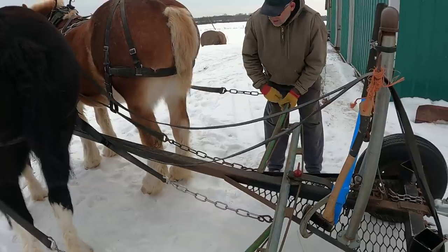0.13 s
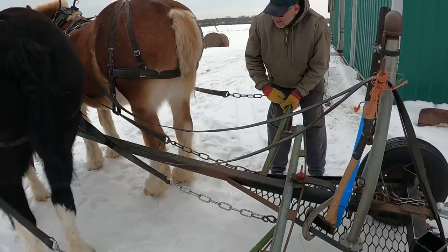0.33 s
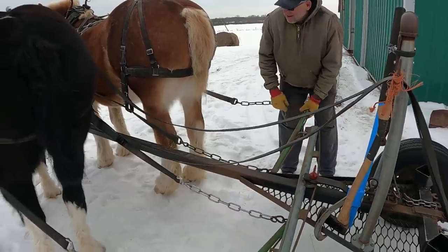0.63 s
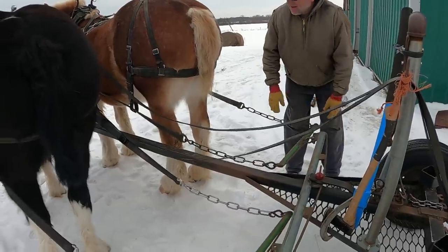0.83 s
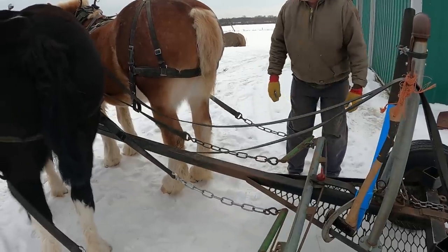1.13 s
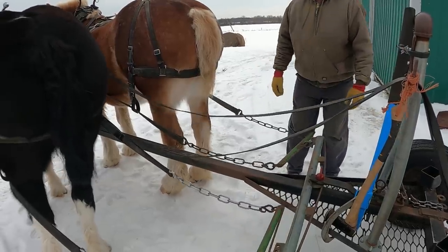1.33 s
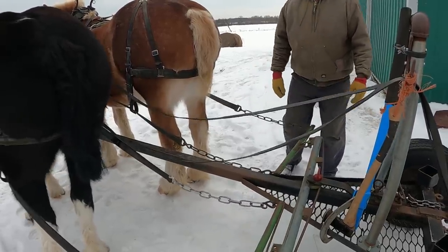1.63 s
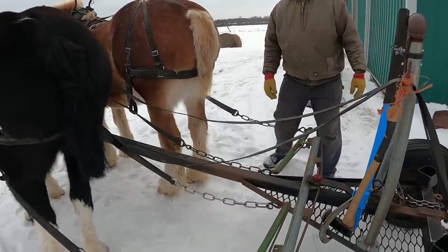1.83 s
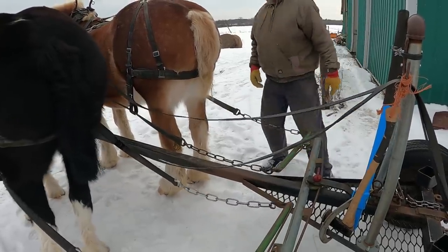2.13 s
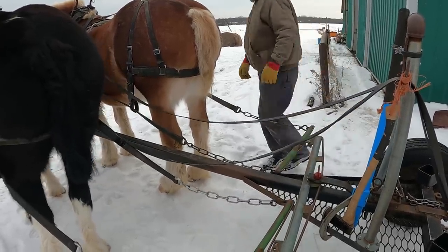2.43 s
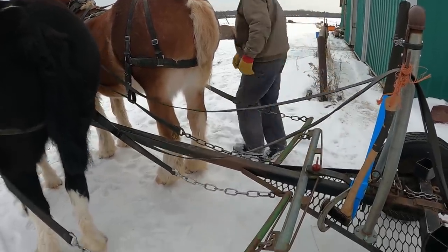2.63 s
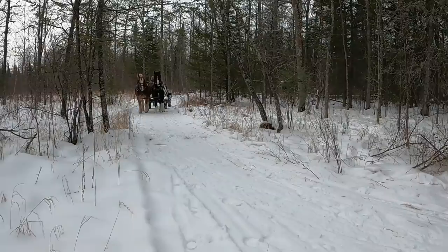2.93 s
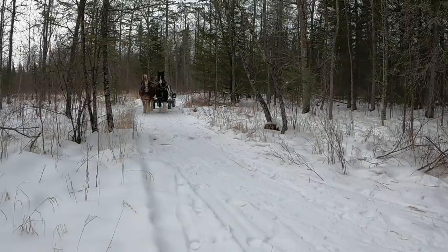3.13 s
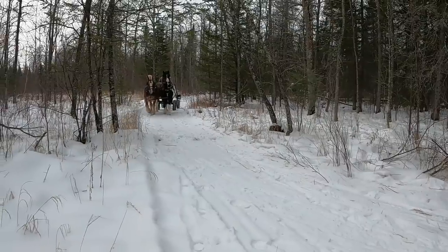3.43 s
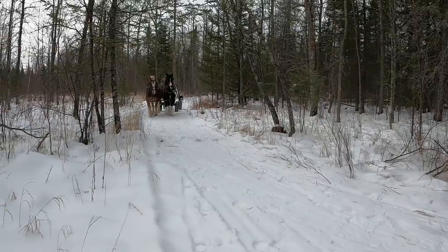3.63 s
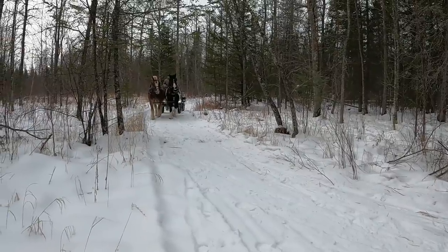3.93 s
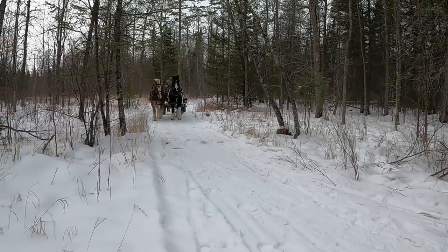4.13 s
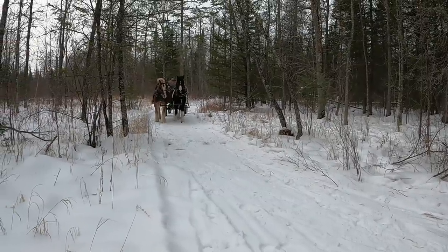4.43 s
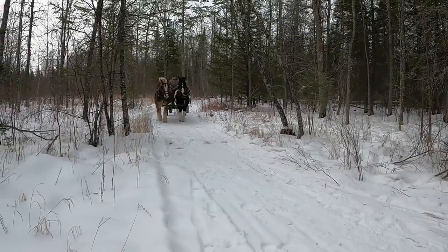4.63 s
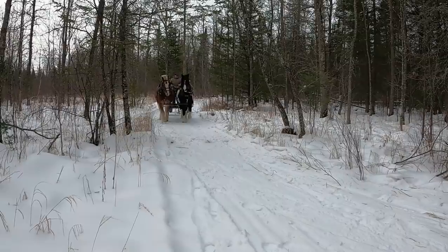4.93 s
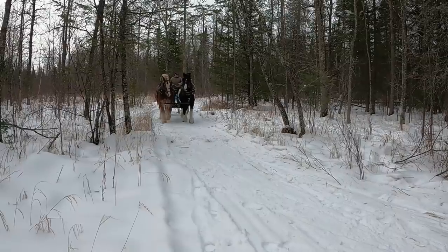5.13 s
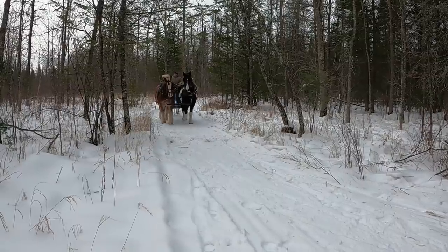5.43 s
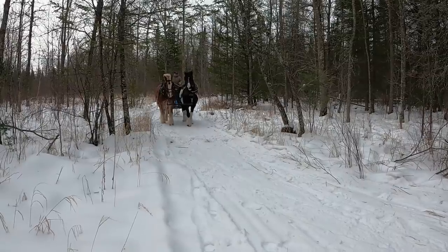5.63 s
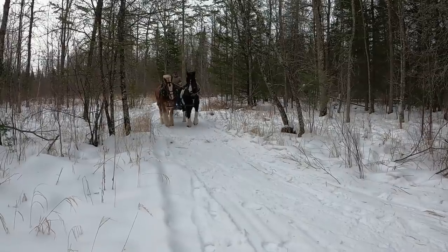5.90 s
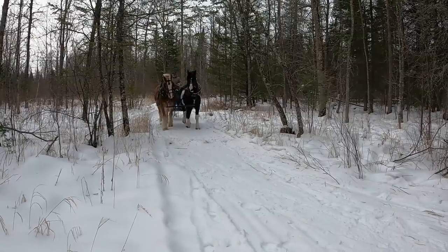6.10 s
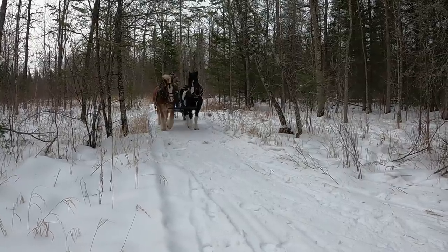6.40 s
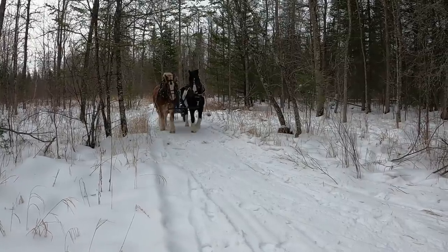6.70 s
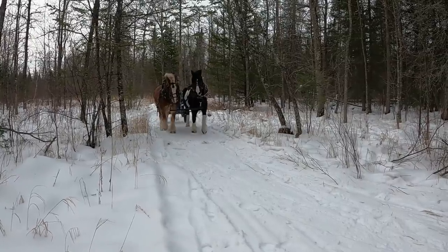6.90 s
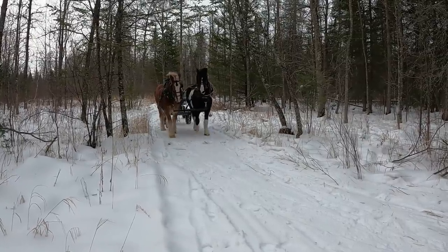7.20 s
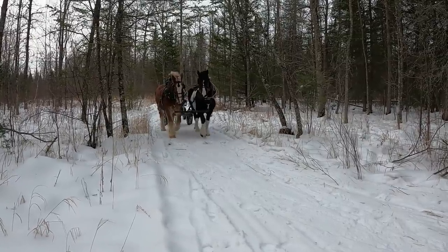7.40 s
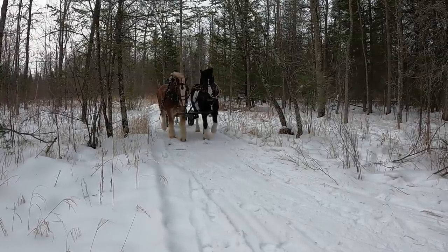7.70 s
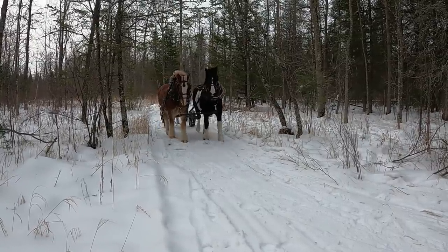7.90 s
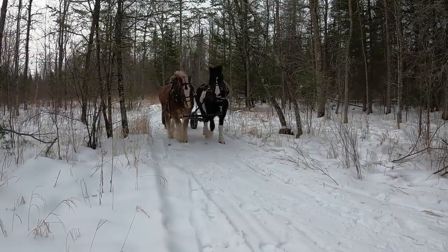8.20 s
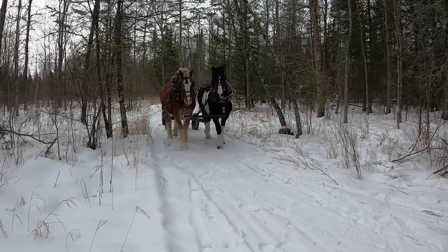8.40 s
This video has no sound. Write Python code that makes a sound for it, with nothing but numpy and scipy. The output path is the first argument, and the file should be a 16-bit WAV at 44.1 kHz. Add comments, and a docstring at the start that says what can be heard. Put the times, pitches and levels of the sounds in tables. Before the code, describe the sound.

For the first three seconds, a close mono snowy yard: chains clank against a steel cart frame, ringing briefly, faintly at first, strongest from 0.55 to 1.1 and 1.6 to 1.9 seconds, with a faint hook ring at 0.15 and 0.4. Wind rumbles on the microphone, with sputtering gusts near 0.4 to 0.5, 0.9 and 1.35. Feet shuffle in snow, with dull thumps at 1.6, 2.0, 2.3 and 2.7. At 3.0 it cuts to a quieter, wide stereo forest trail. Two horses approach, hooves falling out of step about six times a second, tyres hissing and crackling on snow above a low cart rumble. Small clinks grow; bright harness rings stand out at 5.0 to 5.5, a sharp rattle at 6.4, more jingles around 7.4. Heavy hoof thuds and crunches increase from 5.9 to the end at 8.5, with dull reflections from the trunks.

```python
"""A snowy yard, then a forest trail: two draft horses and a steel cart, in two scenes.
Yard, close and mono: trace chains excite the ringing modes of the cart's frame, a hook rings,
feet shuffle and thump as filtered noise and pulses, and wind rumbles on the microphone in octave bands.
Trail, wide stereo, the team nearing: hooves thud and crunch, rings and links sound as decaying sines,
fittings clatter in bursts of clicks, tyres hiss and the trunks return a dull tail."""
import sys
import numpy as np
from scipy import signal
from scipy.fft import rfft, irfft
from scipy.io import wavfile
from scipy.ndimage import uniform_filter1d

SR = 44100
rng = np.random.default_rng(int(sys.argv[2]) if len(sys.argv) > 2 else 0)


def generate_wav(sig):
    """Save sig (samples, or channels by samples) to the path in sys.argv[1] as 16-bit PCM at SR."""
    pcm = np.round(np.clip(np.atleast_2d(sig).T, -1, 1) * 32767).astype(np.int16)
    wavfile.write(sys.argv[1], SR, pcm)


N = 377055
T = np.arange(N) / SR
AGE = T[:SR // 2]   # time since a blow, s


def from_db(db):
    """Decibels to gain."""
    return 10 ** (np.asarray(db) / 20)


def rms_one(x):
    """Scale to unit power."""
    return x / np.sqrt(np.mean(x ** 2) + 1e-20)


def peak_one(x, size=200):
    """Scale so that the loudest few milliseconds have unit power."""
    return x / np.sqrt(uniform_filter1d(x ** 2, size).max() + 1e-20)


def in_time(rows):
    """Draw the level of a (time, level) table over the whole scene."""
    s, db = np.transpose(rows)
    return np.interp(T, s, db)


def at_hz(points, hz):
    """Read a spectrum on a log-frequency axis."""
    f, value = np.transpose(points)
    return np.interp(np.log(hz), np.log(f), value)


def cut(x, hz, kind, order=2):
    """Butterworth filter."""
    return signal.sosfilt(signal.butter(order, hz, kind, fs=SR, output="sos"), x)


def drift(rate):
    """Smooth chance of unit power, with a new random target at the given rate per second."""
    knots = rng.standard_normal(2000)
    return rms_one(np.interp(T * rate, np.arange(len(knots)), knots))


def add(track, s, sound):
    """Mix a sound in at a time."""
    i = max(round(s * SR), 0)
    track[i:i + len(sound)] += sound[:max(N - i, 0)]


def ringing(modes, t60):
    """One decaying sine per mode."""
    hz, db = np.transpose(modes)[:, :, None]
    return from_db(db - 60 * AGE / t60) * np.sin(2 * np.pi * hz * AGE)


def contacts(per_s, spread_db):
    """Random small touches of uneven size, unit power."""
    touched = rng.random(len(AGE)) < per_s / SR
    sizes = from_db(spread_db * rng.standard_normal(len(AGE)))
    return rms_one(touched * rng.choice([-1, 1], len(AGE)) * sizes)


def with_treble(x, treble_db, split_hz=5000):
    """Set the balance of treble to body; a harder contact puts more energy in the treble."""
    body = rms_one(cut(x, split_hz, "low", order=4))
    treble = rms_one(cut(x, split_hz, "high", order=4))
    return peak_one(body + from_db(treble_db) * treble)


def tap(modes, t60, hardness_db, spread_db=3, damped_db=-18, flutter_db=3):
    """A small steel piece flutters as it swings; falling back on its strap checks some modes more."""
    hz = np.transpose(modes)[0]
    tilt_db = hardness_db * np.log2(hz / hz[0])
    strengths = from_db(spread_db * rng.standard_normal(len(hz)) + tilt_db)
    touched = np.clip((AGE - rng.uniform(.03, .08)) / .015, 0, 1)   # strap contact, 0 to 1
    damping = damped_db * np.outer(rng.random(len(hz)), touched)
    flutter = flutter_db * np.cos(2 * np.pi * np.outer(rng.uniform(12, 55, len(hz)), AGE))
    tone = strengths @ (ringing(modes, t60) * from_db(damping + flutter))
    return peak_one(tone) * np.minimum(AGE / .002, 1)


# stereo width of the noises: f/Hz, level/dB (side re mid)
TRAIL_WIDTH = [(60, -66), (240, -13), (950, -9.5), (3770, -2.5), (15000, -7)]


def banded_noise(spectrum, patchy_db):
    """Half-octave bands of stereo noise, each flickering on its own, to unit power."""
    out, edges = 0, 20 * 2 ** (np.arange(21) / 2)
    white = rng.standard_normal((2, 2, N))
    for k, (low, high) in enumerate(zip(edges, edges[1:])):
        hz = np.sqrt(low * high)
        if high > spectrum[0][0] and low < spectrum[-1][0]:
            mid, side = cut(white[k % 2], [low, high], "band")
            gain = from_db(at_hz(spectrum, hz) + patchy_db * drift(60))
            out = out + gain * (mid + from_db(at_hz(TRAIL_WIDTH, hz)) * side * [[1], [-1]])
    return rms_one(out)


# chains striking the cart frame, and at 2.321 s a boot knocking on it: t/s, level/dB (peak), hardness of the
# contact [dB per octave]
CHAIN_BLOWS = [(0.035, -36, -7), (0.141, -35.5, 2.5), (0.194, -38, -2), (0.416, -34.5, -0.5),
               (0.56, -25.5, 0), (0.651, -38.5, 1), (0.705, -23, 3), (0.75, -28, -5), (1.06, -23, -6.5),
               (1.596, -23.5, -5), (1.634, -22, -2.5), (1.807, -27, -2), (1.862, -28.5, -1.5),
               (1.9, -30, -4.5), (1.94, -38, -3), (2.031, -41, -7), (2.321, -49, -6), (2.496, -44.5, -5.5)]
# main modes of the cart frame: f/Hz, level/dB
FRAME_MODES = [(269, -8), (435, -9), (528, -5), (619, -7), (835, -5), (1315, 1), (1540, 2), (1631, 2),
               (1803, -1), (1938, -1), (2384, 2), (3203, -4), (3384, -6), (4197, -8)]
# contour of its many weaker modes: f/Hz, level/dB
FRAME_WEAK_MODES = [(300, -13.5), (1100, -2), (1900, 7), (3400, 4.5), (6700, -5), (15000, -30.5)]


def clanks(frame_t60=0.21, weak_db=-6, weak_t60=0.135, links_db=-22, tumble_s=0.025, onset_s=.005,
           uneven_db=4, tilt_hz=1200, count=420):
    """A chain strikes the frame with a slightly soft onset, then its links tumble;
    the main modes ring longer than most of the weaker high ones."""
    hz = np.linspace(18, 122, count) ** 2 * rng.uniform(.98, 1.02, count)
    weak = np.column_stack([hz, at_hz(FRAME_WEAK_MODES, hz) + weak_db])
    uneven = from_db(uneven_db * hz / hz.max() * rng.standard_normal(count))
    t60 = weak_t60 * uneven * (hz / 2000) ** -.4   # high modes tend to die sooner
    frame = np.vstack([ringing(FRAME_MODES, frame_t60), ringing(weak, t60[:, None])])
    all_hz = np.append(np.transpose(FRAME_MODES)[0], hz)
    octaves = np.maximum(np.log2(all_hz / tilt_hz), 0)   # hardness tilts the modes above tilt_hz
    out = np.zeros(N)
    for s, db, hardness_db in CHAIN_BLOWS:
        force = from_db(links_db) * contacts(450, 6) * np.exp(-AGE / tumble_s)
        force[0] += 1   # the first blow
        chance_db = 3 * rng.standard_normal(len(frame))
        strengths = rng.choice([-1, 1], len(frame)) * from_db(hardness_db * octaves + chance_db)
        ring = signal.fftconvolve(force, strengths @ frame)[:len(AGE)]
        onset = np.minimum(AGE / onset_s, 1) ** 2
        add(out, s - onset_s / 2, from_db(db) * peak_one(ring * onset))
    return out


# blows on a chain hook: t/s, level/dB (peak), hardness [dB per octave]
HOOK_BLOWS = [(0.141, -35, -1), (0.418, -37, -5)]
# modes of the hook: f/Hz, level/dB
HOOK_MODES = [(1453, -12), (2455, -9), (3047, -8), (3908, -14), (4592, -10), (5320, 0), (5771, -11),
              (8576, -5), (9636, -10), (11360, -20), (12630, -26)]
HOOK_T60 = .28   # s


def hook():
    """The hook at the end of a trace chain rings on after the blow."""
    out = np.zeros(N)
    for s, db, hardness_db in HOOK_BLOWS:
        add(out, s, from_db(db) * tap(HOOK_MODES, HOOK_T60, hardness_db))
    return out


# the team draws near: t/s, level/dB (reference for tyres, steps and chains)
TEAM_NEARNESS = [(3.06, -58.5), (3.6, -56.5), (4.7, -55), (5.3, -53), (6.2, -53), (7.4, -49.5), (8.55, -50)]


def nearness_db(s):
    """How loud the team is at a given time."""
    return np.interp(s, *np.transpose(TEAM_NEARNESS))


# first footfall of each horse, same pace but out of step: t/s
FIRST_FOOTFALLS = [3.142, 3.262]
STEP_S, STEP_JITTER_S, STEP_SPREAD_DB = .324, .008, 2


def footfalls():
    """Both horses' even walk with a little chance: rows of (t/s, level/dB)."""
    s = np.concatenate([np.arange(first, T[-1] - .05, STEP_S) for first in FIRST_FOOTFALLS])
    late, strong = rng.standard_normal((len(s), 2)).T
    return np.column_stack([s + STEP_JITTER_S * late, nearness_db(s) + STEP_SPREAD_DB * strong])


# hooves that come down heavily: t/s, level/dB (thud peak), crunch level/dB (re thud)
HEAVY_HOOVES = [(5.937, -39.5, -8), (6.393, -36, -9), (6.826, -38.5, -6.5), (7.006, -40.5, -4.5),
                (7.437, -33.5, -4), (7.746, -34.5, -33), (7.797, -37, -16), (8.001, -32, -4.5),
                (8.136, -40.5, -5), (8.172, -43.5, 3.5), (8.304, -35, -26), (8.334, -34, -5.5)]


def hooves(steps, thud_s=0.011, crunch_s=0.0084, knock_db=24, crunch_hz=(350, 1500),
           light_db=7, light_crunch_db=-7):
    """A hoof knocks through the crust, thuds into the ground and crushes the snow under it."""
    heavy_s = np.transpose(HEAVY_HOOVES)[0]
    # a light step gives way to a heavy one at nearly the same time
    light = [(s, db + light_db, light_crunch_db) for s, db in steps
             if np.abs(heavy_s - s).min() > STEP_S / 10]
    out = np.zeros(N)
    for s, db, crunch_db in list(HEAVY_HOOVES) + light:
        thud = cut(rng.standard_normal(len(AGE)) * np.exp(-AGE / thud_s), [65, 225], "band")
        crush = contacts(1200, 6) * np.exp(-AGE / crunch_s)
        crush[0] += from_db(knock_db)
        crunch = from_db(crunch_db) * peak_one(cut(crush, crunch_hz, "band"))
        add(out, s, from_db(db) * (peak_one(thud) + crunch))
    return out


# taps on a harness ring: t/s, level/dB (peak), hardness [dB per octave]
RING_TAPS = [(3.663, -48.5, 5), (3.930, -45, 5), (4.026, -50, 4), (5.008, -38, 2), (5.091, -41, 1),
             (5.160, -38.5, 5), (5.375, -35.5, 1), (5.525, -28.5, 9.5), (7.187, -42, 1), (7.366, -41, -3),
             (7.429, -35.5, -0.5), (7.99, -43, 10)]
# modes of the ring: f/Hz, level/dB
RING_MODES = [(2686, -15), (3165, -9), (3752, -10), (4673, -11), (5667, -7), (6108, -4), (6395, 0),
              (8430, -15), (10628, -17), (13370, -31), (14070, -35)]
RING_T60, SWING_S, SWING_LOSS_DB = .28, .067, 18.5


def harness_rings():
    """A steel ring is struck, swings back and taps again, more softly."""
    out = np.zeros(N)
    for s, db, hardness_db in RING_TAPS:
        add(out, s, from_db(db) * tap(RING_MODES, RING_T60, hardness_db))
        add(out, s + SWING_S, from_db(db - SWING_LOSS_DB) * tap(RING_MODES, RING_T60, hardness_db))
    return out


# clinks of links of different sizes: t/s, level/dB (peak), pitch f/Hz
LINK_CLINKS = [(3.335, -54, 7666), (4.005, -50, 4581), (4.277, -51, 6056), (5.06, -48, 5669),
               (5.32, -52, 8750), (6.285, -40, 6108), (6.462, -37, 5669), (6.627, -47, 5669),
               (7.131, -41, 6108), (7.675, -50, 6108), (8.318, -49, 4662), (8.318, -54, 8683)]
# modes of the neighbouring links that ring along: f/Hz, level/dB
LINK_MODES = [(4603, -8), (5669, -4), (6108, -9), (8600, -15), (12100, -30)]
LINK_T60 = .21   # s
SOFT_CLINK_T60, SOFT_CLINK_HZ = .08, (5600, 8800)   # taut links: s, range of pitch


def chain_links(steps, per_step=2):
    """Chain links clink with their neighbours; taut ones chink softly and briefly in every step."""
    out = np.zeros(N)
    for s, db, hz in LINK_CLINKS:
        add(out, s, from_db(db) * tap([(hz, 0)] + LINK_MODES, LINK_T60, 0))
    for s, db in np.repeat(steps, per_step, axis=0):
        hz = rng.uniform(*SOFT_CLINK_HZ)
        chink = tap([(hz, 0)] + LINK_MODES, SOFT_CLINK_T60, 0)
        add(out, s + STEP_S * rng.random(), from_db(db) * chink)
    return out


# dry ticks: t/s, level/dB (peak)
DRY_TICKS = [(5.679, -44.5)]


def ticks(decay_s=0.0051, band_hz=(4000, 13000)):
    """A dry tick: a very short burst of bright noise."""
    out = np.zeros(N)
    for s, db in DRY_TICKS:
        burst = rng.standard_normal(len(AGE)) * np.exp(-AGE / decay_s)
        add(out, s, from_db(db) * peak_one(cut(burst, band_hz, "band")))
    return out


# the cart clatters over bumps: t/s, level/dB (peak), decay [s]
CART_BUMPS = [(3.318, -47, 0.014), (3.57, -39.5, 0.011), (4.389, -45, 0.019), (4.965, -41, 0.025),
              (6.403, -31.5, 0.023), (6.424, -28, 0.011), (6.662, -41, 0.021), (7.335, -42.5, 0.043),
              (7.475, -33, 0.0065), (8.016, -48, 0.0065), (8.373, -37, 0.017)]


def clatter(steps, rise_s=0.008, treble_db=-9, shake_db=1, shake_s=0.003,
            body_hz=(1100, 3200), edge_hz=(400, 9500)):
    """Chains and loose fittings shake in dense damped clicks: on bumps, and faintly at every step."""
    shakes = [(s, db + shake_db, shake_s) for s, db in steps]
    out = np.zeros(N)
    for s, db, decay_s in list(CART_BUMPS) + shakes:
        force = contacts(4000, 0.99) * (1 - np.exp(-AGE / rise_s)) * np.exp(-AGE / decay_s)
        sound = cut(cut(force, body_hz, "band", order=1), edge_hz, "band", order=3)
        add(out, s, from_db(db) * with_treble(sound, treble_db))
    return out


# colour of the cart's rumble: f/Hz, level/dB
CART_RUMBLE = [(25, -31), (60, -25), (110, 0), (175, 6), (300, -12), (600, -9), (1200, -47)]


def rumble(mean_db=-51, follows=0.2):
    """The rolling cart rumbles low; its level takes a share of the swing in nearness."""
    near_db = nearness_db(T)
    level_db = mean_db + follows * (near_db - near_db.mean())
    return from_db(level_db) * banded_noise(CART_RUMBLE, patchy_db=4.0)


# colour of the tyre hiss: f/Hz, level/dB
TYRE_HISS = [(300, -12.5), (1300, 14), (2500, 2.5), (6100, 1), (8600, -10), (12200, -14), (16000, -36)]


def tyres(hiss_db=-2.0, grain_db=-7):
    """Snow hisses and crackles under the tyres: flickering noise and random grains of uneven size."""
    hiss = banded_noise(TYRE_HISS, patchy_db=1) * from_db(1.4 * drift(18))
    falls = rng.random(N) < 500 * from_db(5 * drift(10)) / SR   # near 500 grains a second, in flurries
    grains = falls * from_db(4.5 * np.minimum(rng.exponential(1, N), 3))
    crackle = rms_one(cut(cut(grains, [900, 5000], "band", order=1), 8400, "low"))
    return from_db(nearness_db(T)) * (from_db(hiss_db) * hiss + from_db(grain_db) * crackle)


# feet coming down in the yard: t/s, level/dB (peak)
YARD_THUMPS = [(1.597, -20), (1.977, -22), (2.325, -33), (2.667, -29)]


def thumps(band_hz=(45, 170)):
    """A foot comes down on packed snow with one dull push."""
    out = np.zeros(N)
    push = peak_one(cut(1.0 * (AGE == 0), band_hz, "band"))
    for s, db in YARD_THUMPS:
        add(out, s, from_db(db) * push)
    return out


# boots and hooves shuffling in the yard: t/s, level/dB
YARD_SHUFFLE = [(0.03, -49), (0.15, -56.5), (2.2, -55), (2.35, -50.5), (2.47, -59), (2.68, -71.5),
                (2.8, -57.5), (2.97, -50.5)]
# colour of the shuffle: f/Hz, level/dB
SNOW_SHUFFLE = [(300, 15), (2500, 2.5), (8000, -9.5), (14000, -50)]


def shuffle():
    """Boots and hooves shuffle in the snow: patchy noise, folded to mono."""
    noise = banded_noise(SNOW_SHUFFLE, patchy_db=6.0).mean(axis=0)
    return from_db(in_time(YARD_SHUFFLE) + 0.52 * drift(83)) * noise


# wind rumbling on the microphone in the yard: t/s, level/dB
WIND_RUMBLE = [(0.0, -35), (0.17, -45), (0.4, -15), (0.68, -34), (0.79, -24), (0.97, -19.5), (1.21, -42),
               (1.37, -23.5), (1.56, -29.5), (1.84, -31), (1.88, -36), (2.1, -22), (2.23, -37), (2.36, -34),
               (2.45, -47), (2.69, -26.5), (2.75, -33.5), (2.87, -37.5), (2.97, -41.5)]
# gusts breaking into small eddies: t/s, level/dB (eddies), half length [s]
WIND_GUSTS = [(0.369, -39, 0.0033), (0.404, -23, 0.0031), (0.489, -22, 0.01), (0.51, -23, 0.01),
              (0.888, -25.5, 0.005), (0.915, -21.5, 0.0015), (0.91, -40, 0.033), (1.353, -33.5, 0.02),
              (2.04, -46, 0.06), (2.695, -50, 0.027)]


def wind(calm_fall_db=8, full_gust_db=-20, eddy_share=0.55, calm_eddy_db=-24, spit_db=2):
    """Big eddies rumble; in gusts small ones spit on top, reaching higher the harder it blows."""
    big = from_db(in_time(WIND_RUMBLE))
    gusts = sum(from_db(db) ** 2 * np.exp(-((T - s) / length) ** 2) for s, db, length in WIND_GUSTS)
    small = np.sqrt((big * from_db(calm_eddy_db)) ** 2 + gusts)
    # loss from one octave to the next
    fall_db = np.clip(full_gust_db - 20 * np.log10(small), 0, calm_fall_db)
    out = big * rms_one(cut(cut(rng.standard_normal(N), [20, 95], "band"), 145, "low"))
    # from 105 Hz up, one level an octave; the finest eddies spit the most
    levels = [big ** (1 - eddy_share) * small ** eddy_share,
              small,
              small * from_db(-fall_db),
              small * from_db(-8.0 - 2.6 * fall_db)]
    spit = spit_db * drift(140)
    for octave, level in enumerate(levels):
        band = cut(rng.standard_normal(N), np.array([105, 215]) * 2 ** octave, "band", order=3)
        even = band / np.sqrt(uniform_filter1d(band ** 2, size=600))
        out += level * even * rms_one(from_db(octave * spit))
    return out


# light air on the trail: t/s, level/dB
TRAIL_BREEZE = [(3.06, -53.5), (4.3, -55.5), (4.65, -43), (5.2, -57.5), (7.3, -61), (7.75, -48.5),
                (8.55, -60)]


def breeze(side_db=-17):
    """Light air brushes each channel a little differently, as low noise."""
    mid, side = rms_one(cut(rng.standard_normal((2, N)), [20, 85], "band"))
    return from_db(in_time(TRAIL_BREEZE)) * (mid + from_db(side_db) * side * [[1], [-1]])


def yard_air(level_db=-65, top_hz=2360):
    """A quiet, dull hush lies under everything in the yard."""
    return from_db(level_db) * rms_one(cut(rng.standard_normal(N), [200, top_hz], "band"))


def forest(x, t60=0.37, echo_db=-11):
    """Trunks scatter a dull tail, different on each side."""
    noise = cut(rng.standard_normal((2, len(AGE))), [400, 3000], "band", order=1)
    mid, side = noise * from_db(-60 * AGE / t60) * (AGE > .015)
    tails = mid + 0.34 * side * [[1], [-1]]
    echo = signal.fftconvolve(x[None], tails / np.linalg.norm(mid), axes=1)[:, :N]
    return x + from_db(echo_db) * echo


def late_on_the_left(x, lag_samples=0.46):
    """Delay the left channel by a fraction of a sample, as a phase slope."""
    delay = np.exp(-1j * np.pi * lag_samples * np.arange(N + 1) / N)
    return np.stack([irfft(rfft(x[0], 2 * N) * delay)[:N], x[1]])


def scene(yard_ends_s=3.012, trail_begins_s=3.04):
    """The yard, alike in both ears, fades out quickly and the wider trail takes over."""
    yard = clanks() + hook() + thumps() + shuffle() + wind() + yard_air()
    steps = footfalls()
    team = hooves(steps) + harness_rings() + chain_links(steps) + ticks() + clatter(steps)
    trail = late_on_the_left(forest(team)) + rumble() + tyres() + breeze()
    fade_out = np.clip((yard_ends_s - T) / .02, 0, 1)
    fade_in = np.clip((T - yard_ends_s) / (trail_begins_s - yard_ends_s), 0, 1) ** 2
    return yard * fade_out + trail * fade_in


def record(dry, added_treble_db=-5, treble_hz=12000, cutoff_hz=14400):
    """The right channel gets a little more treble; a steep low-pass cuts the top of both."""
    right = dry[1] + from_db(added_treble_db) * cut(dry[1], treble_hz, "high")
    low_pass = signal.ellip(10, .2, 80, cutoff_hz, fs=SR, output="sos")
    return signal.sosfilt(low_pass, np.stack([dry[0], right]))


dry = scene()
out = record(dry)
generate_wav(out)
```